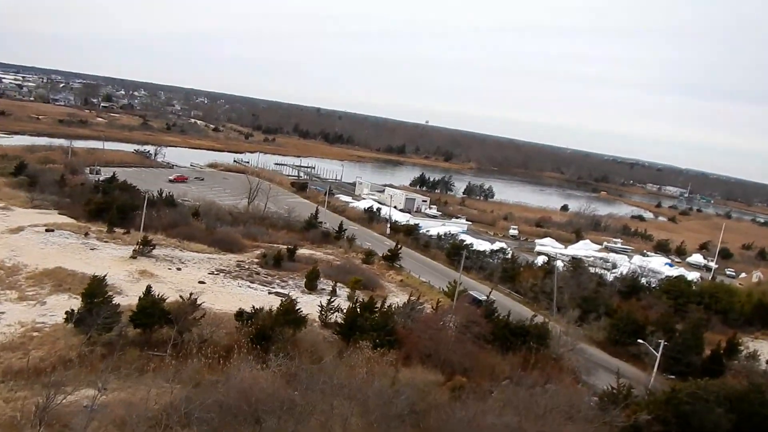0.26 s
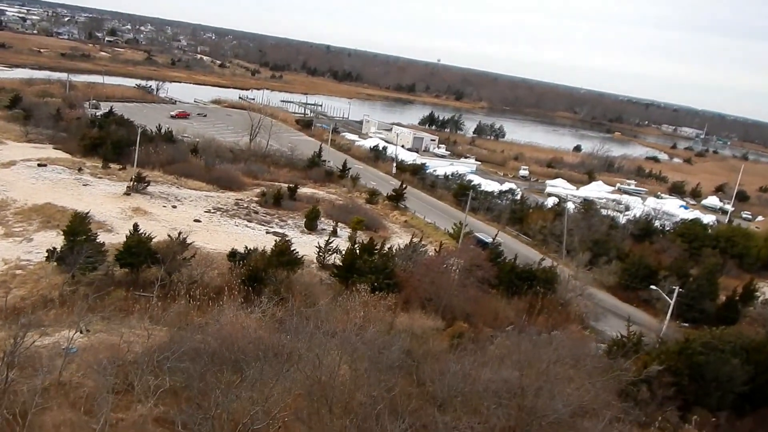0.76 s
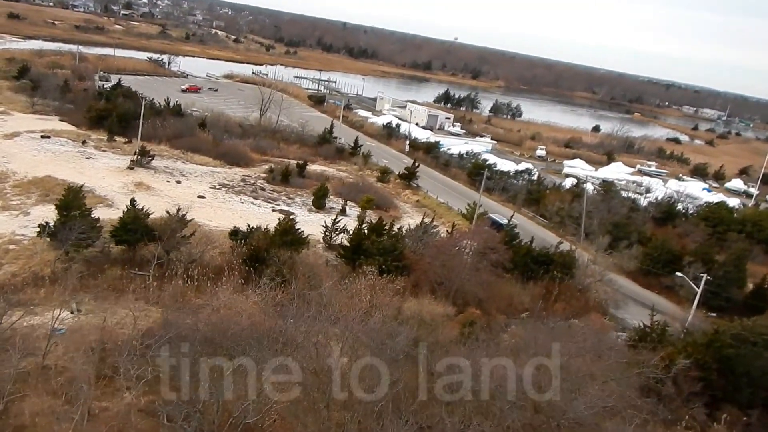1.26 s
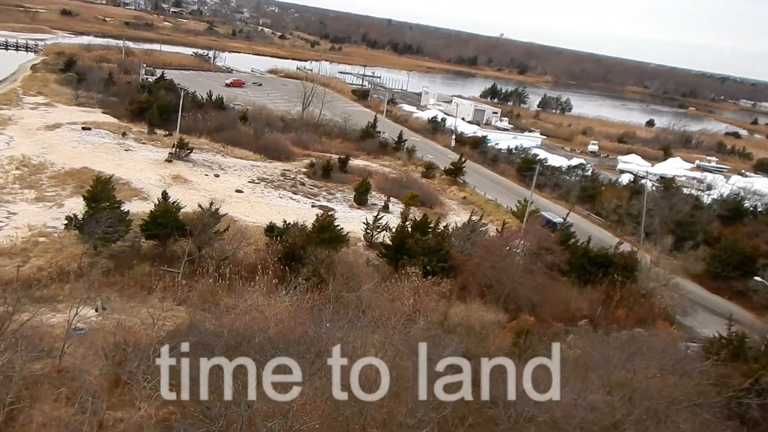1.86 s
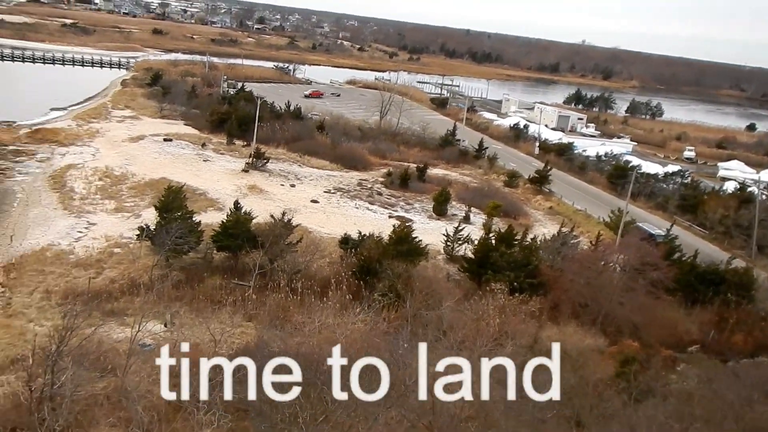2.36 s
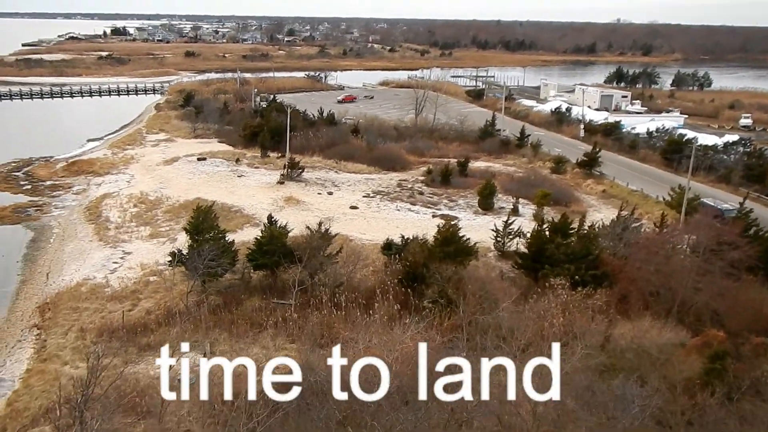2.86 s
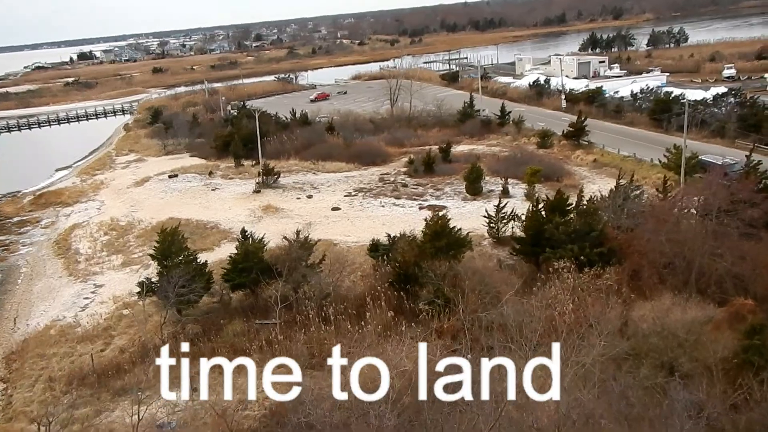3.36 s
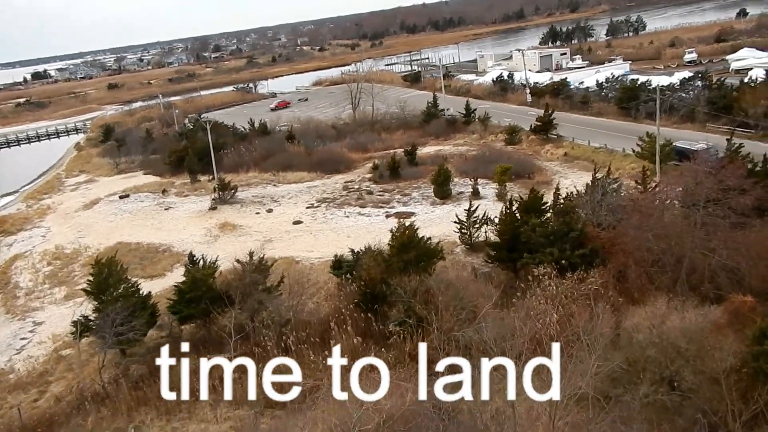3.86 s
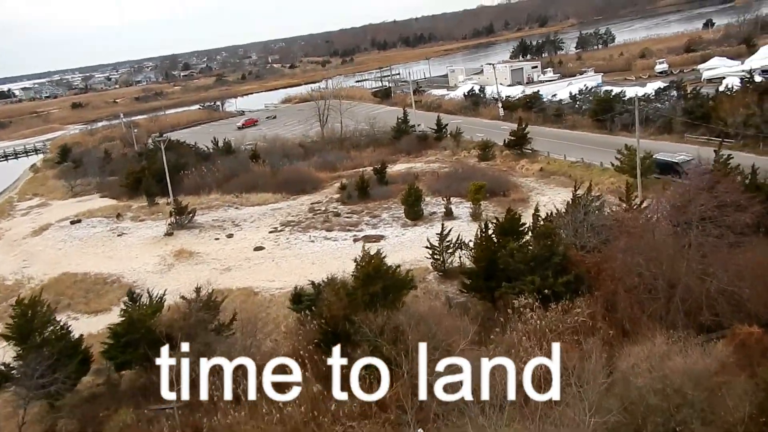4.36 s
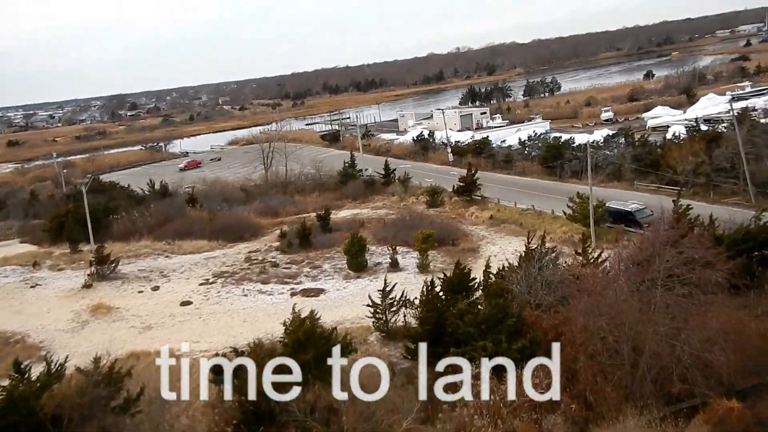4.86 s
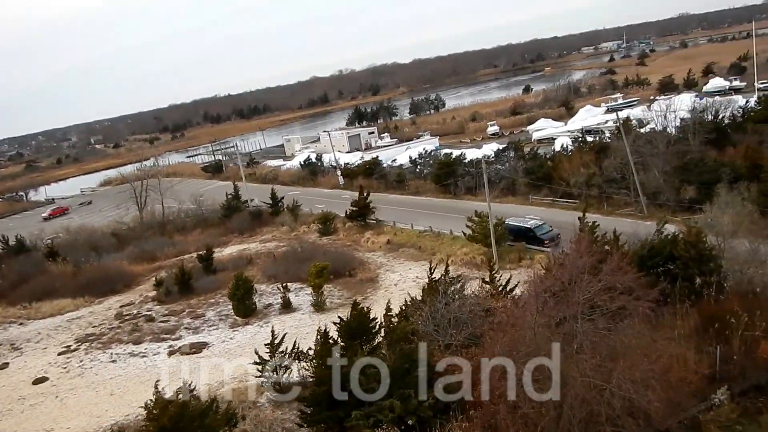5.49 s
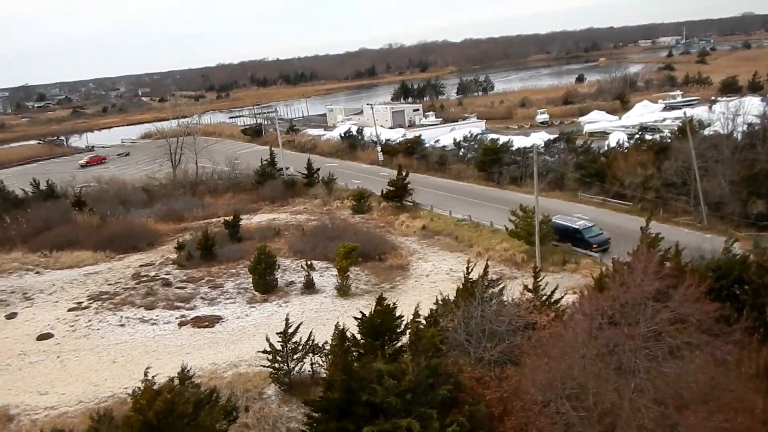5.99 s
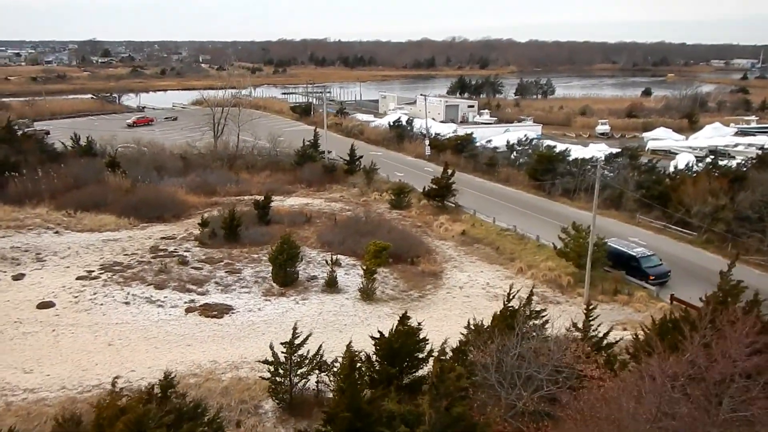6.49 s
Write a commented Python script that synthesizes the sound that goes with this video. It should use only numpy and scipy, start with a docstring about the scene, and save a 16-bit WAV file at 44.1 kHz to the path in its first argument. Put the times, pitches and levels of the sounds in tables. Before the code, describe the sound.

A paramotor idles with irregular pops and rattles until it is shut off, leaving wind and a few sharp handling clicks.

```python
"""A paramotor's two-stroke engine idles in flight, firing on only every second to fifth turn of the crank.
Each firing excites the resonances of muffler and pipe and rattles the frame, over propeller hum and wind.
Near 4.6 s the pilot's hand starts to rustle, squeak and click by friction and impact close to the camera.
At 5.4 s the engine is cut; it spins down and stops with a knock, leaving wind and a few rubs and clicks.
Throughout, the camera's limiter ducks at the sharpest clicks and recovers slowly."""
import sys
import numpy as np
from scipy import signal
from scipy.fft import rfft, irfft, next_fast_len
from scipy.io import wavfile
from scipy.ndimage import uniform_filter1d, minimum_filter1d

SR = 44100
rng = np.random.default_rng(int(sys.argv[2]) if len(sys.argv) > 2 else 0)


def transcribe(signal):
    """Save signal, clipped to [-1, 1], as a 16-bit WAV file at the path in sys.argv[1]."""
    frames = np.atleast_2d(signal).T
    limited = np.clip(frames, -1, 1)
    pcm = np.round(limited * 32767).astype(np.int16)
    wavfile.write(sys.argv[1], SR, pcm)


N = 296773
TIME = np.arange(N) / SR
TURN_S = .0195  # period of the crank at idle
COAST_S, STOP_S = 5.44, 5.90  # the crank starts to coast, and comes to rest


# Irregular engine pops, hard and soft. Each row: time in seconds, relative rattle level in dB.
TIMED_FIRINGS = [(0.0175, -22), (0.0958, -19), (0.1719, -20), (0.3638, -17), (0.4591, -17), (0.554, -24),
                 (0.7868, -28), (0.8448, -23), (0.9024, -22), (0.9793, -20), (1.0551, -19.5), (1.1931, -24),
                 (1.312, -28), (1.3703, -28), (1.4281, -21), (1.4851, -28), (1.5424, -24), (1.6579, -23.5),
                 (1.8887, -26), (1.9473, -19), (2.0635, -28), (2.1225, -23), (2.2604, -28), (2.3397, -21),
                 (2.417, -23), (2.5742, -20.5), (2.6713, -27), (2.7498, -22), (2.8446, -21), (3.0438, -20),
                 (3.3621, -23), (3.5011, -25), (3.5605, -24), (3.6196, -28), (3.6792, -29), (3.7191, -30),
                 (3.7589, -30), (3.7987, -28), (3.8381, -28), (3.8968, -22), (3.9915, -24), (4.0689, -22),
                 (4.1653, -20), (4.263, -27), (4.3218, -24), (4.3998, -21), (4.4941, -27), (4.5513, -29),
                 (4.5901, -22.5), (4.6469, -25), (4.7046, -24), (4.7435, -28), (4.8032, -26), (4.86, -30),
                 (4.9178, -21), (5.0958, -20), (5.25, -28), (5.2895, -21.5), (5.3479, -18), (5.4052, -19)]

def firings(rest_turns=4, soft_turns=3, refill_turns=2, soft_db=-29.5, scatter_db=2.5):
    """Intermittent combustion: the timed pops, and more soft ones in long gaps. Gives times, rattle dB."""
    rows = []
    for (start, db), (end, _) in zip(TIMED_FIRINGS, TIMED_FIRINGS[1:]):
        turns = round((end - start) / TURN_S)
        rows.append((start, db))
        for turn in range(rest_turns, turns - refill_turns + 1, soft_turns):
            rattle_db = soft_db + scatter_db * rng.standard_normal()
            rows.append((start + (end - start) * turn / turns, rattle_db))
    return np.transpose(rows + [TIMED_FIRINGS[-1]])


def crank_pace():
    """Speed as a share of idle: it goes as the root of kinetic energy, lost evenly after the cut."""
    energy = np.clip((STOP_S - TIME) / (STOP_S - COAST_S), 1e-9, 1)
    return np.sqrt(energy)


def crank_turns(fired, pace, sag=0.1):
    """Angle is the integral of speed: whole turns between firings, then a free spin-down."""
    between = np.round(np.diff(fired) / TURN_S)
    steady = np.interp(TIME, fired, np.r_[0, np.cumsum(between)])
    lead_in = np.minimum(TIME - fired[0], 0) / TURN_S
    # each firing kicks the speed up; it sags until the next one
    cycle = np.interp(TIME, fired, np.arange(len(fired)))
    phase = cycle % 1
    surge = sag * np.r_[between, 0][cycle.astype(int)] * phase * (1 - phase) / 2
    spin_down = np.cumsum(pace / TURN_S * (TIME > fired[-1])) / SR
    return steady + surge + lead_in + spin_down


# Muffler resonances. Each row: frequency in Hz, time to the peak in seconds, relative level in dB.
MUFFLER_MODES = [(308.8, 0.01, -19.5), (435, 0.0031, -4.5), (504.4, 0.017, -24), (590, 0.01, -15),
                 (892, 0.0044, -28), (1120, 0.0036, -20), (1817, 0.0036, -32.5)]

def exhaust(fired, strokes, pace, chuff_db=-10, scatter_db=2.1):
    """Impulse response: the muffler's modes swell and die at each firing, more weakly on unfired turns."""
    t = np.arange(SR // 10) / SR
    pop = -sum(gain_of(db) * pulse(t, peak_s) ** 2 * np.sin(2 * np.pi * hz * t)
               for hz, peak_s, db in MUFFLER_MODES)
    unfired = strokes[abs(strokes[:, None] - fired).min(1) > TURN_S / 2]
    chuff_sizes = gain_of(chuff_db + scatter_db * rng.standard_normal(len(unfired)))
    return strike(fired, 0.82, pop) + pace * strike(unfired, chuff_sizes, pop)


# Exhaust pipe resonances. Each row: frequency in Hz, bandwidth in Hz, relative level in dB.
PIPE_MODES = [(99, 30, -41), (134.9, 13.4, 4.5), (260, 6.3, -13.5), (277.5, 8.1, -14)]

def pipe(fired, motion, firing_db=-13, lag_s=0.003, flow_db=-32):
    """Air column resonance: the pipe booms after each firing, and gas flow keeps it droning faintly."""
    ring = ringing(PIPE_MODES)
    drone = unit_rms(signal.oaconvolve(rng.standard_normal(N), ring)[:N])
    return strike(fired + lag_s, gain_of(firing_db), ring) + gain_of(flow_db) * motion * drone


# Airbox resonances. Each row: frequency in Hz, bandwidth in Hz, relative level in dB.
AIRBOX_MODES = [(82.5, 290, -12.5), (133.6, 24.4, 12), (225.4, 26, 1)]

def intake(strokes, pace, dead, stroke_db=-25, coast_boost_db=7.5, lag_s=0.00718):
    """Cavity resonance: the piston gulps air on every turn and rings the airbox."""
    pumping = pace ** 0.22 * gain_of(coast_boost_db * dead)
    sizes = gain_of(stroke_db + rng.standard_normal(len(strokes))) * np.interp(strokes, TIME, pumping)
    return strike(strokes + lag_s, sizes, ringing(AIRBOX_MODES))


# Hum of crank and propeller. Each row: multiple of the crank speed, level at idle in dB.
HUM_HARMONICS = [(5, -29), (6, -23), (7, -31), (8, -30), (9, -33), (10, -36), (11, -37), (12, -32)]

def hum(turns, pace, waver_cycles=0.05):
    """Periodic rotation radiates harmonics, which waver in phase and fade as the cube of the speed."""
    tones = sum(gain_of(db) * np.sin(2 * np.pi * (k * turns + rng.random() + waver_cycles * wander(13)))
                for k, db in HUM_HARMONICS)
    return pace ** 3 * tones


# Air churned by propeller and engine. Each row: frequency in Hz, relative spectral density in dB.
CHURN_SPECTRUM = [(15, -30), (55, -12), (130, -9), (300, -7), (400, -7.5), (520, -8.5), (600, -8.5),
                  (660, -14.5), (880, -10.5), (1130, -11.5), (1370, -17.5), (1750, -17), (2200, -21.5),
                  (2800, -39), (12000, -110)]

def churn(fired, turns, motion, dead, churn_db=-26, coast_db=-1, throb=0.054, blast=0.93, blast_s=0.0023):
    """Modulated turbulence: the noise throbs with the crank, and its upper part flares at each firing."""
    age = np.arange(SR // 10) / SR / blast_s
    flare = strike(fired, 0.94, 2 * np.sqrt(age) * np.exp(-age))
    air = noise(CHURN_SPECTRUM, apart=0.015)
    upper = signal.sosfiltfilt(signal.butter(3, 800, "highpass", fs=SR, output="sos"), air)
    throbbing = air * (1 + throb * np.cos(2 * np.pi * turns))
    return motion * gain_of(churn_db + coast_db * dead) * (throbbing + blast * flare * upper)


# Metal clatter and a hard kick's snap. Each row: frequency in Hz, relative spectral density in dB.
CLATTER_SPECTRUM = [(500, 14), (1800, 6), (2400, -14.5), (3050, -3.5), (3600, -16), (4300, -11.5),
                    (5200, 5.5), (5750, 6.5), (6400, -3), (7100, -18.5), (8400, -23.5), (10500, -38),
                    (16000, -77)]
SNAP_SPECTRUM = [(1500, -25), (3400, -18), (4600, 0), (6200, 1), (7500, -14), (9500, -26), (12000, -42),
                 (16000, -45)]

def clatter(fired, rattle_db, strokes, motion, whirr_db=-42, tick_db=-44, uneven_db=3, snap_from_db=-21):
    """Impact noise: metal parts whirr, tick each turn, rattle at firings and snap at the hardest kicks."""
    t = np.arange(SR // 20) / SR
    late, size = rng.standard_normal((len(strokes), 2)).T
    ticks = strike(strokes + 0.013 * late, gain_of(tick_db + 2 * size), pulse(t, peak_s=0.0071))
    rattles = strike(fired - .001, gain_of(rattle_db - 1), pulse(t, peak_s=0.0033))
    rattles *= unit_rms(gain_of(uneven_db * wander(400)))
    snap_sizes = gain_of(rattle_db - 6) * (rattle_db >= snap_from_db)
    snaps = strike(fired + 0.0024, snap_sizes, np.exp(-t / .002))
    # incoherent sources add in power
    envelope = np.sqrt(motion ** 2 * (gain_of(whirr_db) ** 2 + ticks ** 2) + rattles ** 2)
    return envelope * noise(CLATTER_SPECTRUM, apart=0.37) + snaps * noise(SNAP_SPECTRUM, apart=1.0)


# The dead engine's thud. Each row: frequency in Hz, bandwidth in Hz, relative level in dB.
THUD_MODES = [(73.5, 7.3, -26), (107, 22, -16), (257, 12, -21.5), (527, 68, -44)]

def coasting_thuds(strokes, pace, dead, lag_s=0.00567, scatter_db=2):
    """Damped resonance: without firings the piston sputters, giving an uneven thud on each stroke."""
    sizes = gain_of(scatter_db * rng.standard_normal(len(strokes)))
    return dead * pace ** 0.64 * strike(strokes + lag_s, sizes, ringing(THUD_MODES))


def coasting_tones(turns, pace, dead, db=-7, tilt_db=-2.2):
    """Pitch follows rotation rate: the coasting piston's harmonics slide down with the crank."""
    tones = sum(gain_of(db + tilt_db * k) * np.sin(2 * np.pi * (k * turns + rng.random()))
                for k in (3, 4, 6, 7))
    return np.sqrt(dead) * pace * tones


# Modes that ring in each click. Each row: frequency in Hz, relative level in dB, t60 in seconds.
CLICK_MODES = [(875, 5, .025), (1300, -2, .05), (1750, 5, .045), (2150, 1, .025), (3100, 0, .012),
               (4650, -6, .02), (5006, 0, .065), (5330, 1, .035), (5700, -2, .025), (6400, -1, .03),
               (6050, 0, .035), (7000, -3, .04), (7900, -12.5, .04), (9000, -17, .04)]
# Clicks of the gear, and one low knock as the engine stops at 5.9 s. Each row: start in seconds,
# peak level in dB, centre frequency in Hz, weight of the low knock in dB, left minus right in dB.
CLICKS_AND_KNOCK = [(0.2334, -13.5, 4300, -1, -6), (0.287, -23, 3800, -5, -13), (1.167, -14, 2900, 7, -9),
                    (4.766, -3.5, 6300, 2, 0), (4.804, -14, 5340, -12, -2), (4.813, -11.5, 5600, -14, 0),
                    (4.836, -10, 6850, -20, -3), (4.856, 5.5, 7550, -20, -2), (5.153, -28, 5800, -15, 0),
                    (5.174, -19, 5400, -8, 0), (5.198, -5.5, 6030, -7, 1), (5.223, -12.5, 5800, -18, -1),
                    (5.402, -14, 5100, -5, -3), (5.4414, -21, 4970, -11, -5), (5.665, -20.5, 5670, -19, -3),
                    (5.749, -36, 5800, -12, -1), (5.784, -29, 5570, -12, 0), (5.856, -13, 6560, 4, 1),
                    (5.903, -20, 5450, 25, 0), (5.970, -23, 5600, -18, 0), (6.009, -19, 5200, -19, -1),
                    (6.0149, -11, 5600, -7, -8), (6.017, 3.5, 5560, -8, 1.5), (6.0375, -27, 6500, -15, 0),
                    (6.3922, 2, 4300, -4.5, 7.5), (6.3936, -13, 4800, 2, -13)]

def clicks(width_octaves=.4, ring_db=-27, snap_s=.0014, crack=.45, knock_hz=2200, contact_s=.0002):
    """Modal impact: a hard contact gives a dry crack, a low knock and modes near one pitch, then rings."""
    t = np.arange(SR // 12) / SR
    out = np.zeros((2, N))
    hz, mode_db, t60 = np.transpose(CLICK_MODES)[:, :, None]
    attack = 1 - np.exp(-(t / contact_s) ** 2)
    envelope = attack * (np.exp(-t / snap_s) + gain_of(ring_db - 60 * t / t60))
    for start, db, centre_hz, knock_db, pan_db in CLICKS_AND_KNOCK:
        near_centre = 1 / (1 + (np.log2(hz / centre_hz) / width_octaves) ** 4)
        weight = gain_of(mode_db) * np.where(hz < knock_hz, gain_of(knock_db), near_centre)
        band = signal.butter(2, [centre_hz / 1.5, centre_hz * 1.25], "bandpass", fs=SR, output="sos")
        for channel, side in enumerate((1, -1)):
            phases = .5 * rng.standard_normal(hz.shape)
            modes = (weight * envelope * np.sin(2 * np.pi * hz * t + phases)).sum(0)
            burst = signal.sosfilt(band, rng.standard_normal(len(t)) * np.exp(-t / snap_s))
            snap = unit_rms(modes) + crack * unit_rms(burst)
            snap *= gain_of(db + side * pan_db / 2) / abs(snap).max()
            slot = out[channel, round(start * SR):][:len(t)]
            slot += snap[:len(slot)]
    return out


# Rubs of hand and cloth. Each row: time of the peak in seconds, build-up in seconds, level in dB,
# level of the scrape relative to the rub in dB.
HAND_RUBS = [(4.789, 0.13, -24.5, -21), (5.19, 0.064, -24, -25), (5.41, 0.028, -35, -19),
             (5.87, 0.14, -34, -31), (5.989, 0.097, -34, -19), (6.38, 0.22, -37.5, -24)]
# Cloth and its bright scrape. Each row: frequency in Hz, relative spectral density in dB.
CLOTH_SPECTRUM = [(600, 15), (1800, 8.5), (2500, -2.5), (3100, 3.5), (4000, -12), (5300, 6), (6000, 7.5),
                  (7500, -25), (9500, -21), (11500, -59), (16000, -94)]
SCRAPE_SPECTRUM = [(3000, -21), (6500, 4), (8500, 1), (11000, -18.5), (13000, -34), (16000, -60.5)]

def rustle(grain_db=3.5, release_s=0.078):
    """Friction noise: cloth rubs in clumps of small slips, and a firm rub adds a bright scrape."""
    rubbing = sum(swell(s, build_s, db, release_s) for s, build_s, db, _ in HAND_RUBS)
    scraping = sum(swell(s, build_s, db + scrape_db, release_s) for s, build_s, db, scrape_db in HAND_RUBS)
    slips = unit_rms(gain_of(grain_db * np.minimum(wander(75), 2)))
    cloth = rubbing * noise(CLOTH_SPECTRUM, apart=0.47)
    scrape = scraping * noise(SCRAPE_SPECTRUM, apart=0.42)
    return slips * (cloth + scrape)


# Squeaks of the grip. Each row: start in seconds, length in seconds, frequency in Hz, level in dB.
GRIP_SQUEAKS = [(4.642, 0.15, 2830, -32.5), (5.162, 0.022, 3260, -27.5), (5.394, 0.026, 5180, -19.5),
                (5.422, 0.031, 5100, -34), (5.783, 0.12, 5700, -29)]

def squeaks(width_hz=650, slip_db=9.0):
    """Stick-slip friction: the grip catches and lets go, stirring one narrow resonance at a time."""
    out = np.zeros(N)
    for start, length, hz, db in GRIP_SQUEAKS:
        resonance = signal.iirpeak(hz, hz / width_hz, SR)
        band = signal.lfilter(*resonance, signal.lfilter(*resonance, rng.standard_normal(N)))
        progress = np.clip((TIME - start) / length, 0, 1)
        out += gain_of(db) * np.sqrt(abs(np.sin(np.pi * progress))) * unit_rms(band)
    return out * unit_rms(gain_of(slip_db * wander(120)))


# Level of the wind as heard: it dips near 6 s, then comes back up.
# Each row: time in seconds, rush in dB, buffeting in dB.
WIND_LEVELS = [(0, -21.5, -31), (6.0, -26, -33), (6.45, -22, -33)]
# Gusts on the microphone. Each row: time of the peak in seconds, build-up in seconds, level in dB.
WIND_GUSTS = [(5.5, 0.018, -27), (6.19, 0.013, -14.5)]
# Rushing air and low buffeting. Each row: frequency in Hz, relative spectral density in dB.
RUSH_SPECTRUM = [(15, -18), (60, -5.5), (130, 0), (280, -3), (440, -12), (700, -14.5), (1500, -27.5),
                 (2400, -38), (4000, -52), (5600, -38.5), (8300, -57), (12000, -100)]
BUFFET_SPECTRUM = [(10, -7.5), (30, -19.5), (60, 6), (100, 6), (250, -48), (800, -102)]

def wind(waver_db=2.5, release_s=0.014):
    """Turbulent flow: air rushes past the pilot, and its pressure swings buffet the microphone."""
    times, *levels = np.transpose(WIND_LEVELS)
    rush_db, buffet_db = [np.interp(TIME, times, db) for db in levels]
    rush = noise(RUSH_SPECTRUM, apart=0.083) * gain_of(rush_db + waver_db * wander(12))
    gusts = sum(swell(*gust, release_s) for gust in WIND_GUSTS)
    return rush + noise(BUFFET_SPECTRUM, apart=0.31) * (gain_of(buffet_db) + gusts)


def gain_of(db):
    """The decibel law: tenfold amplitude for every 20 dB."""
    return 10 ** (np.asarray(db) / 20)


def unit_rms(x):
    """Normalisation to a mean power of 1."""
    return x / np.sqrt(np.mean(x ** 2) + 1e-20)


def pulse(t, peak_s):
    """A critically damped response, which reaches 1 at peak_s."""
    return t / peak_s * np.exp(1 - t / peak_s)


def swell(peak_s, build_s, db, release_s):
    """An envelope of Gaussian rise and exponential decay."""
    late = TIME - peak_s
    return gain_of(db) * np.exp(-np.where(late < 0, (late / build_s) ** 2, late / release_s))


def ringing(modes):
    """A cavity's impulse response: each mode decays at a rate set by its bandwidth."""
    t = np.arange(SR // 4) / SR
    return sum(gain_of(db) * np.exp(-np.pi * width * t) * np.sin(2 * np.pi * hz * t)
               for hz, width, db in modes)


def strike(times, sizes, shape):
    """Convolution with an impulse train plays one shape at the given times and sizes."""
    train = np.zeros(N)
    np.add.at(train, np.clip(np.round(times * SR).astype(int), 0, N - 1), sizes)
    return signal.oaconvolve(train, shape)[:N]


def wander(hz):
    """Low-pass noise: a random drift of rms 1, up to the given rate."""
    bins = rfft(rng.standard_normal(32768))[:4096]
    slow = irfft(bins / (1 + (np.arange(4096) * SR / N / hz) ** 4), 8192)
    return unit_rms(np.interp(np.linspace(0, 1, N), np.linspace(0, 1, len(slow)), slow))


def noise(spectrum, apart, port_hz=2600):
    """Partial coherence: noise at two microphone ports differs more for short waves, by at least apart."""
    size = next_fast_len(N)
    bin_hz = np.fft.rfftfreq(size, 1 / SR)
    hz, db = np.transpose(spectrum)
    colour = gain_of(np.interp(np.log(bin_hz + 1), np.log(hz + 1), db))
    mid, side = rfft(rng.standard_normal((2, size))) * colour
    side *= np.maximum(apart, np.minimum((bin_hz / port_hz) ** 2.64, .4))
    return unit_rms(irfft(np.array([mid + side, mid - side]), size)[:, :N])


def scene(handover_s=0.24, idle_db=4):
    """Superposition: firings and crank drive every part of the engine; wind and the hand join it."""
    fired, rattle_db = firings()
    pace = crank_pace()
    turns = crank_turns(fired, pace)
    strokes = TIME[1:][np.diff(np.floor(turns)) > 0]  # one per turn
    motion = gain_of(idle_db) * pace ** 0.86  # gain of the moving parts
    dead = np.clip((TIME - COAST_S) / handover_s, 0, 1)  # 0 while running, rising to 1 after the cut
    gas = exhaust(fired, strokes, pace) + pipe(fired, motion) + intake(strokes, pace, dead)
    coasting = coasting_thuds(strokes, pace, dead) + coasting_tones(turns, pace, dead)
    rotation = hum(turns, pace) + churn(fired, turns, motion, dead)
    engine = gas + coasting + rotation + clatter(fired, rattle_db, strokes, motion)
    balance = gain_of([[-.3], [.3]])
    return (engine + wind()) * balance + rustle() + squeaks() + clicks()


def record(dry, band_hz=(25, 10000), notch_hz=2510, ceiling_db=-1.2, recovery_db_per_s=12, edge_hz=15600):
    """Filtering and peak limiting: the microphone's band and notch, a slow-release limiter, a low-pass."""
    sound = signal.sosfilt(signal.butter(3, band_hz, "bandpass", fs=SR, output="sos"), dry)
    sound = signal.lfilter(*signal.iirnotch(notch_hz, Q=12, fs=SR), sound)
    over_db = np.maximum(20 * np.log10(abs(sound).max(0) + 1e-9) - ceiling_db, 0)
    recovery_db = TIME * recovery_db_per_s
    duck_db = minimum_filter1d(recovery_db - np.maximum.accumulate(over_db + recovery_db), size=33)
    limited = sound * gain_of(uniform_filter1d(duck_db, size=33))
    low_pass = signal.firwin(255, edge_hz, window=("kaiser", 9), fs=SR)
    return signal.oaconvolve(limited, low_pass[None], "same")


dry = scene()
out = record(dry)
transcribe(out)
```